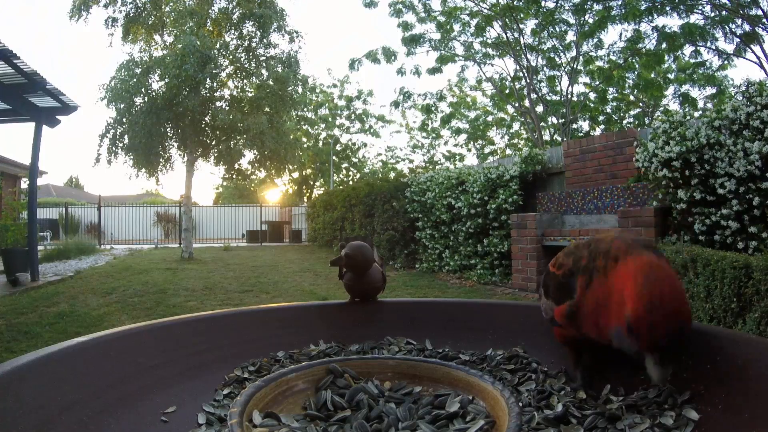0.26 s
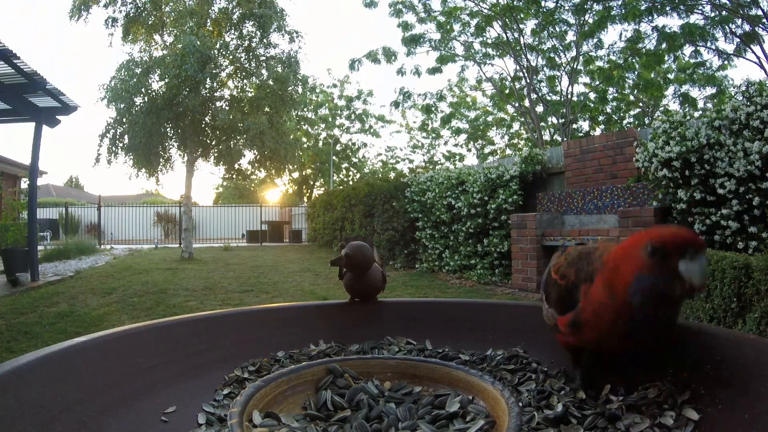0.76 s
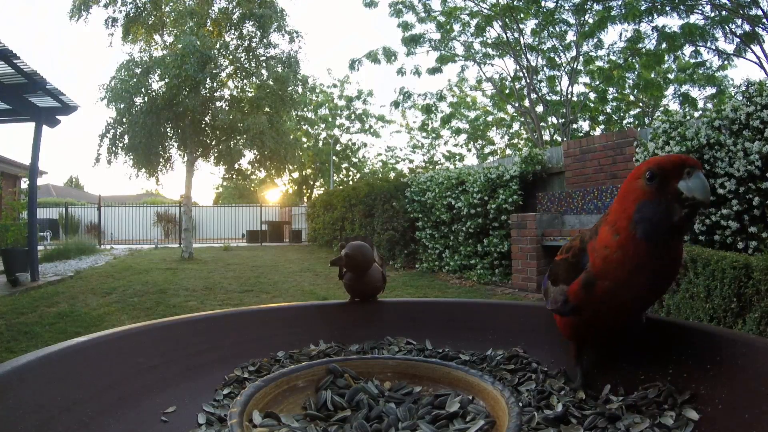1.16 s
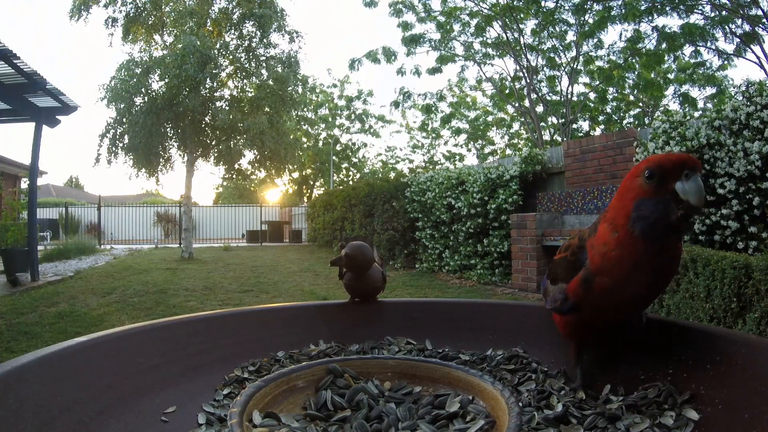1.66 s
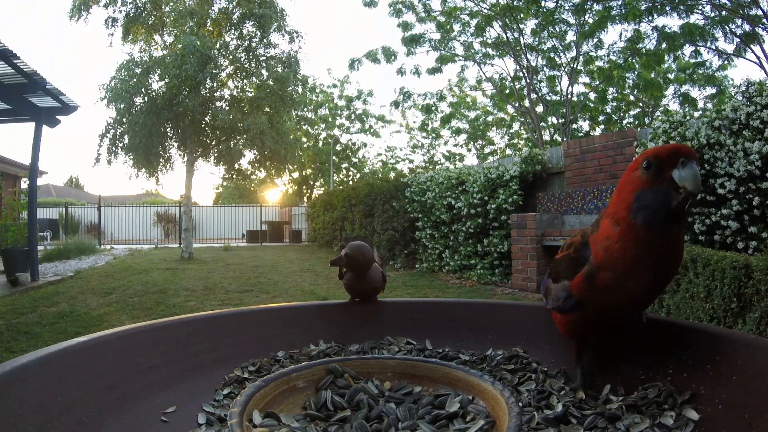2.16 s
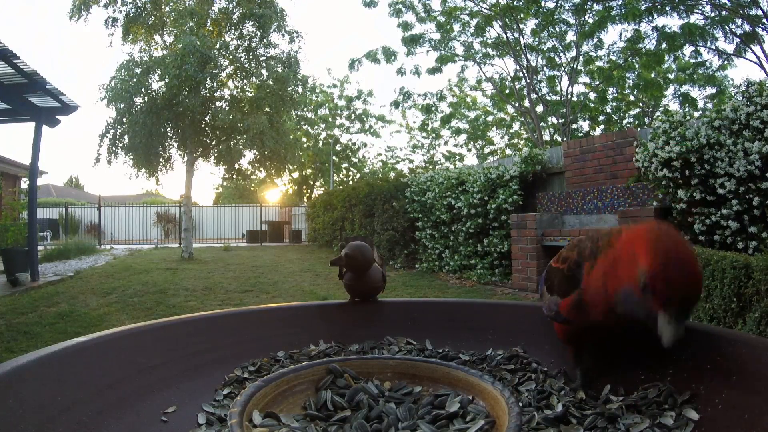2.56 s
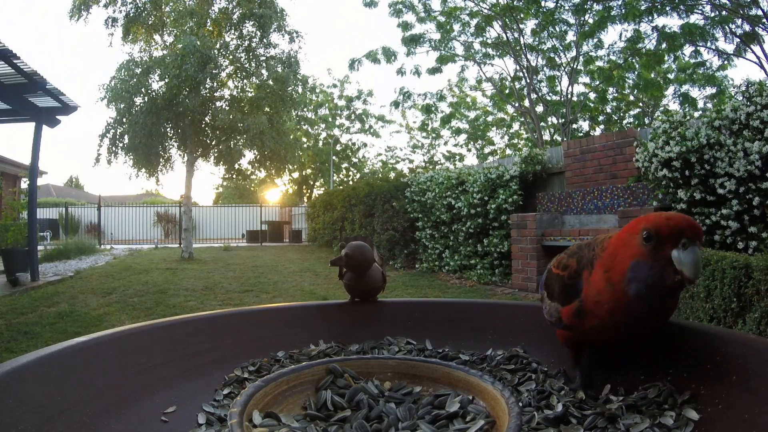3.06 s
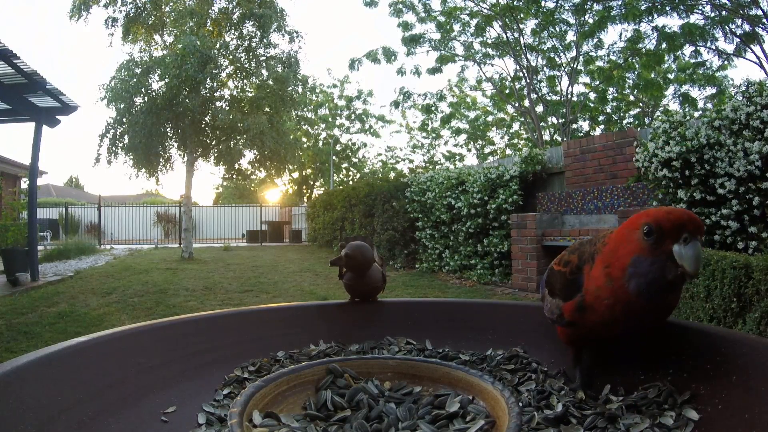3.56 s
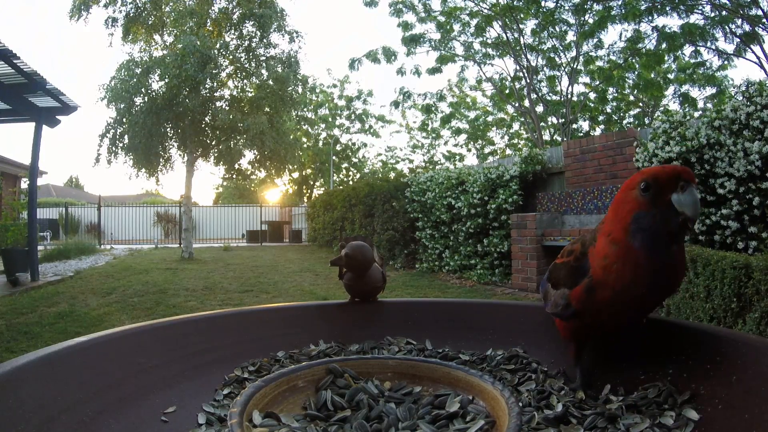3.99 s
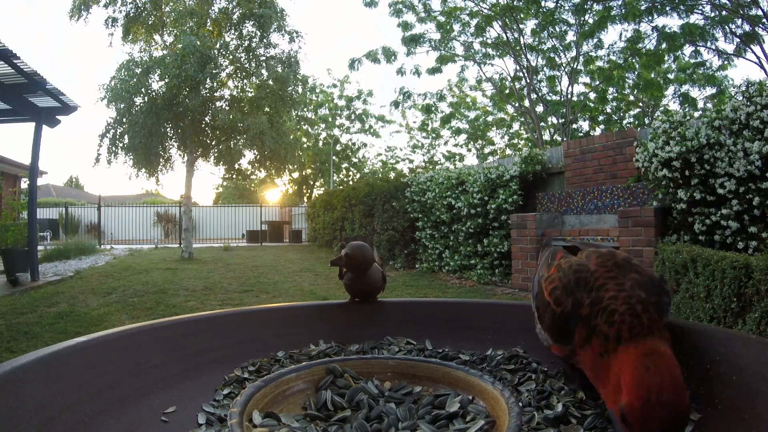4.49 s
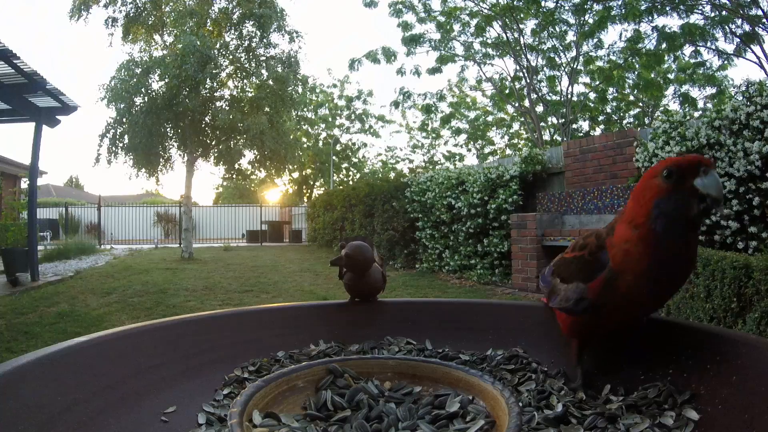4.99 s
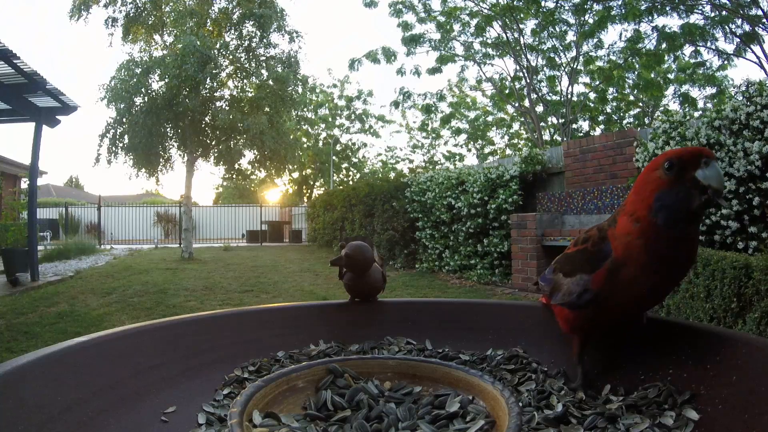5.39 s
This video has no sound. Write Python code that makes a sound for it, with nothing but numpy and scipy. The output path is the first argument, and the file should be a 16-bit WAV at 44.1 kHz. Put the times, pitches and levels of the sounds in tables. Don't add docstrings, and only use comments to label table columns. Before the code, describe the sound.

Close beak knocks and crisp husk clicks on a thin metal tabletop, with one low boom and a bouncing shell over quiet garden hiss.

```python
import sys
import numpy as np
from scipy import signal
from scipy.fft import rfft, irfft
from scipy.io import wavfile
from scipy.ndimage import uniform_filter1d

SR = 44100
rng = np.random.default_rng(int(sys.argv[2]) if len(sys.argv) > 2 else 0)


def gain_from_decibels(decibels):
    exponent = np.asarray(decibels, float) / 20
    return 10 ** exponent


def log_audio(samples):
    frames = np.atleast_2d(samples).T
    limited = np.clip(frames, -1, 1)
    pcm = np.round(limited * 32767).astype(np.int16)
    wavfile.write(sys.argv[1], SR, pcm)


N = 248724

TABLE_LOW_HZ = [32.8, 59.7, 88.3, 109.8, 130, 146.7, 189.8, 210.5]
# pitch in Hz, level in dB, t60 in seconds.
TOUCHED_TOP = [(1158, -15.5, 0.16), (1287, -10, 0.13), (1366, -2.5, 0.097), (1416, -9, 0.08),
               (1780, -15, 0.091), (2227, -11, 0.13), (2310, -4, 0.085), (2500, -7.5, .09),
               (2770, -13, .09), (2970, -17, 0.11), (3090, -3, 0.066), (3220, -1, 0.078), (3394, -18, .08),
               (4430, -12, 0.062), (5120, -16, 0.054), (5300, -19, 0.071), (6050, -8, .05),
               (6330, -1, 0.038), (6500, -4, 0.069), (6500, -9, 0.046), (6660, -9, 0.046)]


def evened(x):
    return x / np.sqrt(np.mean(x ** 2) + 1e-20)


def add(mix, s, sound):
    part = mix[round(s * SR):][:len(sound)]
    part += sound[:len(part)]


def ring(hz, db, t60, seconds, turn=0.):
    t = np.arange(int(seconds * SR)) / SR
    return gain_from_decibels(db - 60 * t / t60) * np.cos(2 * np.pi * (hz * t + turn))


def contact(t, ms):
    return np.sin(np.pi / 2 * np.clip(t / (ms / 1000), 0, 1)) ** 2


def air():
    # pitch in Hz, density in dB per Hz.
    hiss = [(12, -24), (20, 0.5), (59, -3.5), (92, -2.5), (121, -5), (151, -4.5), (174, -5.5), (211, -7.5),
            (484, -12.5), (525, -13), (674, -15), (1550, -21), (2850, -25), (9110, -38), (15000, -50)]
    level_db, patch_db = -54, 0.5
    frames, hz = N // 512 + 5, np.fft.rfftfreq(2048, 1 / SR)
    real, imaginary, patches = rng.standard_normal((frames, 1025, 3)).T
    patches = uniform_filter1d(patches, 20, 0)
    patches = evened(uniform_filter1d(patches, 8, 1))
    hiss_hz, hiss_db = np.transpose(hiss)
    colour_db = np.interp(np.log(hz + 1), np.log(hiss_hz + 1), hiss_db)
    z = (real + 1j * imaginary) * gain_from_decibels(colour_db[:, None] + patch_db * patches)
    noise = signal.istft(z, nperseg=2048, noverlap=1536)[1][:N]
    return gain_from_decibels(level_db) * evened(noise)


def shuffle():
    # start, strongest moment and end in seconds, sway in dB, claw scrape in dB.
    shifts = [
        (0.0, .05, 0.46, -54, -73),
        (.75, .85, 1.08, -51.5, -67.5),
        (2.5, 2.6, 2.8, -58.5, -69),
        (2.7, 2.9, 3.08, -57, -68),
        (4.206, 4.55, 4.75, -58, -66.5),
        (4.55, 4.722, 4.9, -52.5, -77),
        (4.813, 4.93, 5.8, -54.5, -70.5),
    ]
    sway_fall_db, scrape_fall_db = -5, -8
    sway_levels_db = (2.0, -5.5, -3.0, -7, -7, -13.5)
    sway = sum(ring(hz, db, 0.88, 1, 1 / 4) for hz, db in zip(TABLE_LOW_HZ, sway_levels_db))
    scrape = sum(ring(*mode, .2) for mode in TOUCHED_TOP[:4])
    scrape *= contact(np.arange(len(scrape)) / SR, 2.8)
    grit = rng.standard_normal(N) * (rng.random(N) < 300 / SR)
    sway = evened(signal.fftconvolve(grit, sway)[:N])
    scrape = evened(signal.fftconvolve(grit, scrape)[:N])
    out, t = np.zeros(N), np.arange(N) / SR
    for *s, sway_db, scrape_db in shifts:
        slack = np.interp(t, s, [1, 0, 1])
        edge = np.clip(np.minimum(t - s[0], s[-1] - t) / 0.065, 0, 1)
        out += edge * gain_from_decibels(sway_db + sway_fall_db * slack) * sway
        out += edge * gain_from_decibels(scrape_db + scrape_fall_db * slack) * scrape
    return out


def boom():
    # level in dB, t60 in seconds.
    low_ring = [(-43, 1.1), (-34, 0.44), (-38.5, 1.3), (-35, 1.87), (-26, 0.93), (-32, 1), (-44.5, 0.68),
                (-48.5, 0.69)]
    # pitch in Hz, level in dB, t60 in seconds.
    dull_modes = [(351, -53.5, 0.21), (525, -53.5, 0.2), (710, -55, 0.15), (876, -48.5, 0.12)]
    blow_s = .6528
    out = np.zeros(N)
    push = np.hanning(120)
    modes = 0
    for k, hz in enumerate(TABLE_LOW_HZ):
        lag = -1 / 4 if k == 0 else 0
        modes = modes + (-1) ** k * ring(hz, *low_ring[k], 2, lag)
    add(out, blow_s - len(push) / 2 / SR, signal.fftconvolve(modes, push / push.sum()))
    dip = -gain_from_decibels(-30) * np.hanning(round(0.0077 * SR))
    add(out, blow_s - .001, dip)
    thud = sum(ring(*mode, .2, rng.random()) for mode in dull_modes)
    add(out, blow_s - .003, thud * contact(np.arange(len(thud)) / SR, 1.8))
    return out


def touch(kind, strength_db, hard_db=0, edge_db=0):
    return strength_db + np.append(0, np.add(kind[:3], [hard_db, hard_db, hard_db + edge_db]))


def knock(modes, levels_db, ms, spread_db, thicket_db, damping=1):
    # pitch in Hz, level in dB, t60 in seconds.
    thicket = [(600, -38, 0.068), (1040, -38, 0.15), (1100, -16.5, .09), (1390, -12, 0.15),
               (1570, -16, .09), (1880, -23, 0.087), (2400, -11.5, 0.23), (3240, -3.5, 0.1),
               (3680, -15, 0.1), (5000, -10, 0.1), (5630, -16.5, .08), (6500, -1, 0.068),
               (6840, -15.5, 0.093), (9950, -14, 0.056), (15000, -35, 0.035)]

    def struck_db(hz):
        return np.interp(hz, [1600, 2050, 2750, 2850, 3600, 5000], np.repeat(levels_db, 2)[1:-1])

    thin = 0
    for hz, db, t60 in modes:
        luck_db, turn = spread_db * rng.standard_normal(), rng.standard_normal()
        thin = thin + ring(hz, db + struck_db(hz) + luck_db, t60 / damping, 0.26, turn)
    n = len(thin)
    f, db, t60 = np.transpose(thicket)
    hz = np.fft.rfftfreq(n, 1 / SR)
    colour = gain_from_decibels(np.interp(np.log(hz + 1), np.log(f), db) + struck_db(hz) + thicket_db)
    noise = irfft(rfft(rng.standard_normal(n)) * colour, n)
    hz, t, z = signal.stft(noise, SR, nperseg=128)
    dying = gain_from_decibels(-60 * t / np.interp(hz, f, t60)[:, None])
    weak = signal.istft(z * dying, nperseg=128)[1]
    return gain_from_decibels(1.5) * (thin + weak[:n]) * contact(np.arange(n) / SR, ms)


def falling_shell():
    low_hz = [1122, 1153, 1281, 1361, 1421, 1622, 1737, 1817, 2219, 2340, 2439, 2488, 2692, 2764, 2861]
    high_hz = [2897, 2958, 3088, 3229, 3556, 4086, 4393, 4727, 5120, 5534, 5760, 6234, 6450, 6551, 6751]
    # level in dB, t60 in seconds.
    mode_ring = [(-24, 0.13), (-13.5, 0.24), (-8, .08), (0.5, 0.09), (-4, 0.063), (-22.5, 0.33), (-20, 0.3),
                 (-21, 0.27), (-6.5, 0.059), (-9, 0.065), (-10, 0.079), (-11, 0.21), (-14.5, 0.4),
                 (-12, .16), (-12, 0.13), (-5, 0.17), (-17, .12), (-16, 0.098), (-11, 0.18), (-14, 0.088),
                 (-21, 0.21), (-15, 0.11), (-13, .15), (-15.5, 0.3), (-19, 0.2), (-12, 0.18), (-16, 0.33),
                 (-5.5, .1), (-11, 0.17), (-15, .14)]
    hard_shell = (-3, -3.5, -15.5, 2)
    # start in seconds, strength in dB, extra hardness in dB, extra edge in dB, contact in ms.
    bounces = [
        (2.1186, -24.5, 0, 1.5, 2.5),
        (2.129, -30, 2.5, -3, 1.06),
        (2.186, -48.5, 4, 7, 2.9),
        (2.192, -43.5, -1.5, 4, 2),
        (2.22, -52.5, 0, 8.5, 2),
    ]
    out = np.zeros(N)
    modes = np.column_stack([low_hz + high_hz, mode_ring])
    for k, (s, *how, ms) in enumerate(bounces):
        damping = 1.1 if k == 1 else 2.2
        add(out, s, knock(modes, touch(hard_shell, *how), ms, 0.66, 8.6, damping))
    return out


def touches():
    soft_pad = (-22, -19, -28, 7.5)
    claw = (-10, -14.5, -16.5, 3.5)
    digging = (-3.5, -10.5, -27, 2.5)
    hard_tip = (-13.5, -6, -6, 2.5)
    # start in seconds, strength in dB.
    pad_steps = [(.384, -52.5), (2.576, -54.5), (4.264, -51.5), (4.414, -53.5), (4.427, -53), (4.918, -60)]
    # start in seconds, strength in dB.
    claw_knocks = [(.899, -53), (4.471, -61), (4.492, -57), (4.563, -54), (4.577, -46.5), (4.609, -51)]
    # start in seconds, strength, extra hardness, extra edge in dB.
    digs = [
        (4.592, -48, -3, 8),
        (4.658, -53, 6, 0),
        (4.6657, -44, 0.5, -6),
        (4.8552, -43, -8.5, 12),
        (5.0, -53.5, -1.5, 2),
    ]
    # start in seconds, strength, extra hardness, extra edge in dB.
    taps = [
        (.0395, -38.5, 2.5, -3),
        (0.7298, -51, 0, 0),
        (.929, -63, -1, -3),
        (2.4343, -42.5, -3.5, 3),
        (4.456, -62.5, -8, 9),
        (5.04, -62.5, 9, -10),
    ]
    out = np.zeros(N)
    for kind, rows in [(soft_pad, pad_steps), (claw, claw_knocks), (digging, digs), (hard_tip, taps)]:
        for s, *how in rows:
            add(out, s, knock(TOUCHED_TOP, touch(kind, *how), kind[-1], 1.2, 14.6))
    return out


def beak_blows():
    # pitch in Hz, level in dB, t60 in seconds.
    blow_modes = [(1174, -17, .12), (1335, -6, 0.1), (1414, -2.5, .09), (2210, -11, .1), (2487, -5.5, 0.29),
                  (2680, -18, .14), (3073, -13, .11), (3270, -13, .1), (3620, -16, 0.11), (4020, -18, 0.11),
                  (4310, -11, .12), (4980, -11, .12), (5965, -3, 0.066), (6380, -2, .09)]
    heavy_beak = (-13, -10, -17, 5)
    # start in seconds, strength in dB, extra hardness in dB, extra edge in dB, contact in ms.
    blows = [
        (.64, -35.5, -0.5, -1, 7.4),
        (.649, -35, 2, -3, 3.8),
        (.673, -43, 6, -3, 4.5),
        (.704, -43, -4, -16, 4.4),
    ]
    out = np.zeros(N)
    for s, *how, ms in blows:
        add(out, s, knock(blow_modes, touch(heavy_beak, *how), ms, 1.2, 14.6))
    return out


def beak_ticks():
    # start in seconds, peak in dB, pitch in Hz, t60 in seconds.
    ticks = [(0.2344, -65, 7520, 0.011), (0.381, -60, 8440, 0.0091), (1.3808, -37, 6340, 0.0051),
             (1.73, -57, 7250, 0.014), (1.755, -59, 7300, 0.012), (1.7684, -54, 7040, 0.012),
             (1.773, -57, 7300, 0.012), (1.8657, -58, 7300, 0.011), (1.923, -62, 7370, 0.012),
             (4.6243, -56, 8250, 0.013), (4.7194, -63, 8450, 0.012)]
    # pitch in Hz, level in dB, t60 in seconds.
    side_rings = [(2700, -11.5, 0.016), (8330, -10, 0.0079), (4400, -15, .005), (13800, -24, .004)]
    out, t = np.zeros(N), np.arange(int(.03 * SR)) / SR
    for s, db, hz, t60 in ticks:
        modes = [(hz, 0, t60), (hz * 1.1, -6, t60)] + side_rings
        rings = sum(ring(*mode, .03, rng.random()) for mode in modes)
        crack = np.diff(rng.standard_normal(len(t) + 1)) * gain_from_decibels(-25 - 60 * t / .008)
        add(out, s, gain_from_decibels(db + 2) * (rings + crack) * contact(t, 0.58))
    return out


def scene():
    table = shuffle() + boom() + falling_shell() + touches() + beak_blows()
    return (air() + table + beak_ticks())[None]


def roll_off(x):
    return signal.sosfilt(signal.butter(12, 15180, fs=SR, output="sos"), x)


def record(dry):
    sparse_hz, edge_hz = 12800, 15150
    hz, t, z = signal.stft(dry, SR, nperseg=2048)
    patch = uniform_filter1d(abs(z), size=5, axis=1)
    kept = patch > np.median(patch, axis=2, keepdims=True)
    z = np.where(hz[:, None] > sparse_hz, gain_from_decibels(3.0) * kept * z, z)
    thinned = signal.istft(z, SR, nperseg=2048)[1][:, :N]
    edge = signal.firwin(511, edge_hz, window=("kaiser", 9), fs=SR)
    return roll_off(signal.oaconvolve(thinned, edge[None], "same"))


dry = scene()
out = record(dry)
log_audio(out)
```